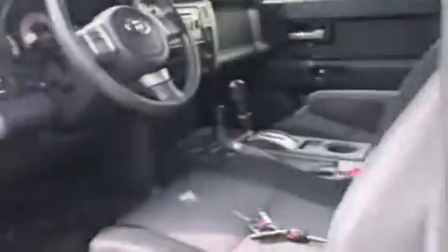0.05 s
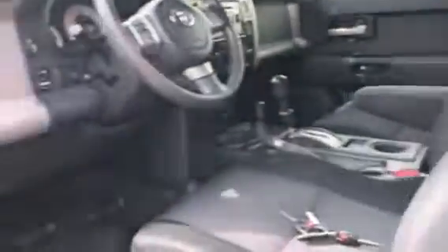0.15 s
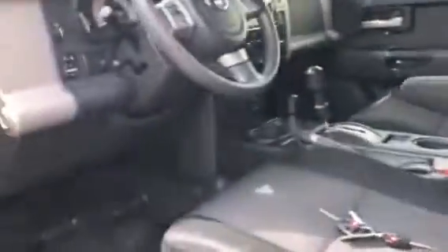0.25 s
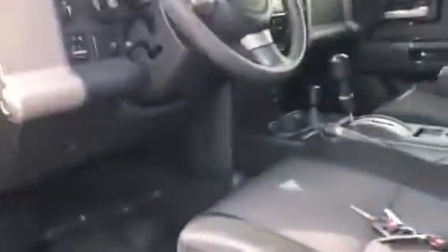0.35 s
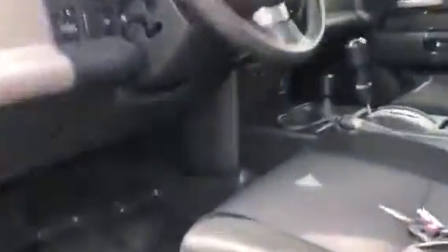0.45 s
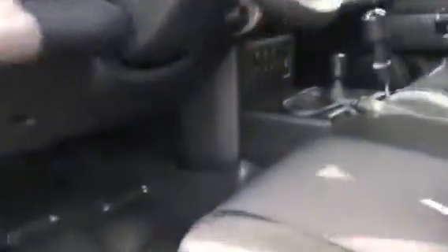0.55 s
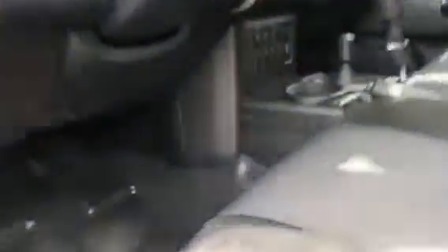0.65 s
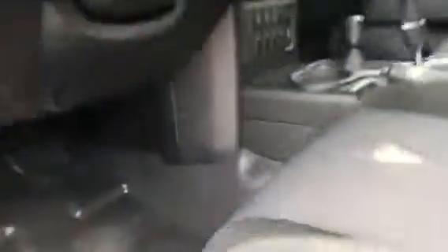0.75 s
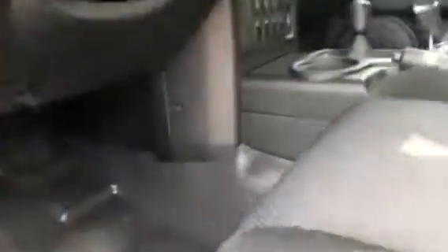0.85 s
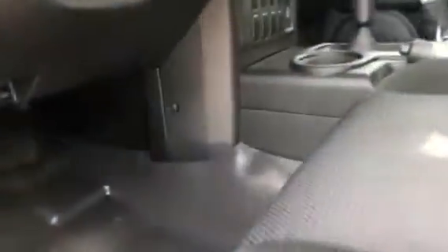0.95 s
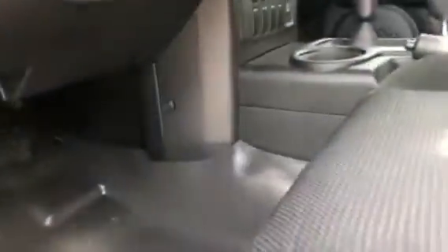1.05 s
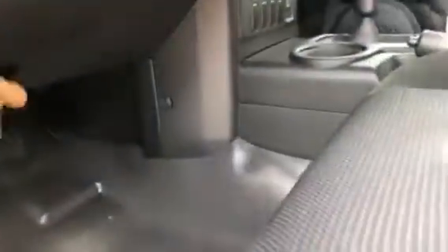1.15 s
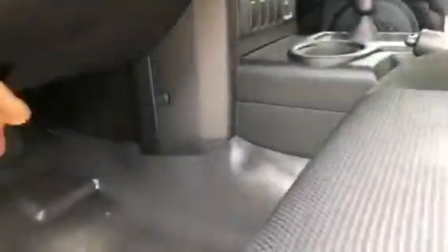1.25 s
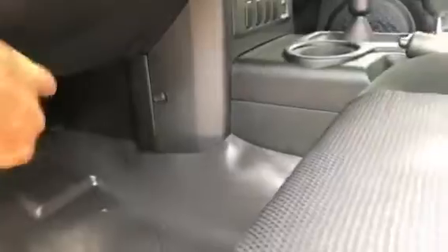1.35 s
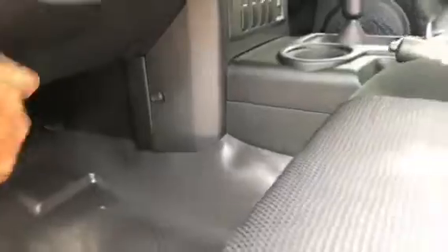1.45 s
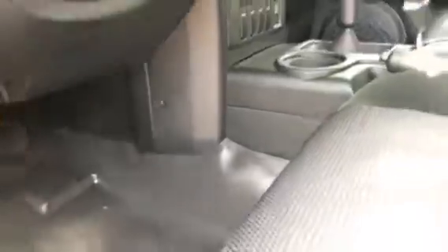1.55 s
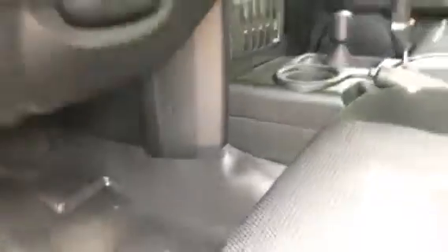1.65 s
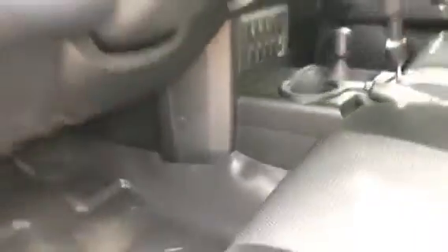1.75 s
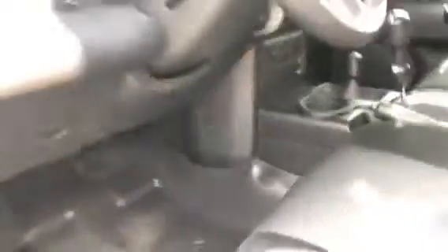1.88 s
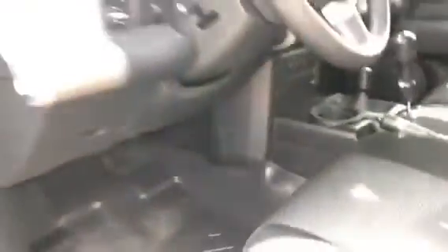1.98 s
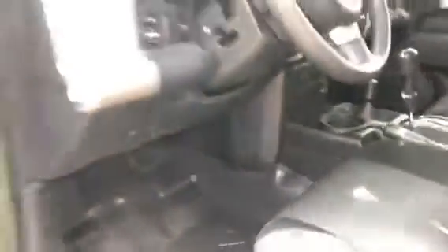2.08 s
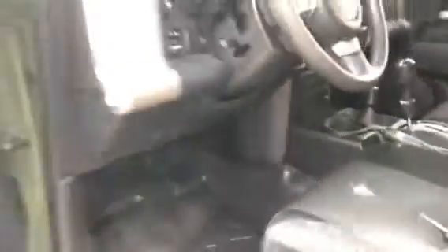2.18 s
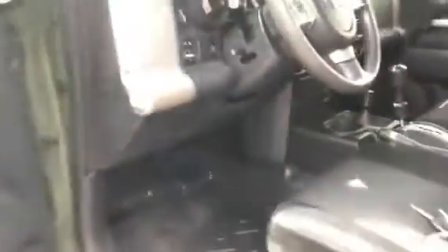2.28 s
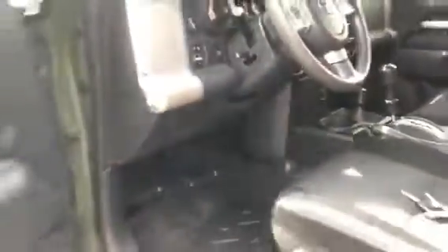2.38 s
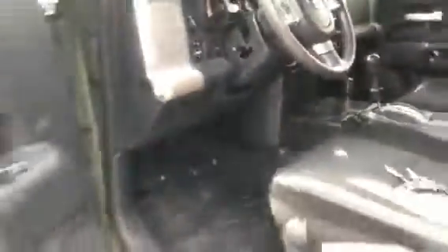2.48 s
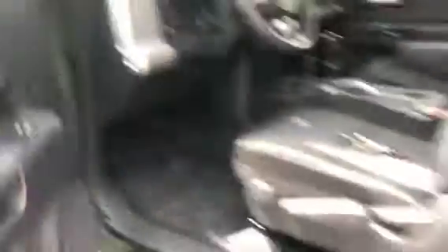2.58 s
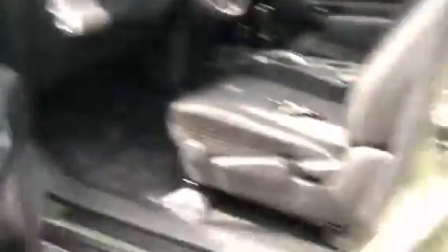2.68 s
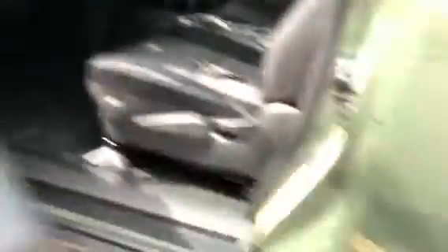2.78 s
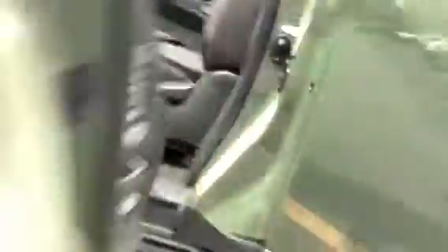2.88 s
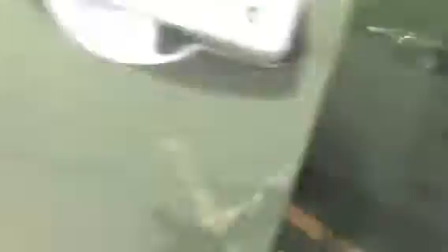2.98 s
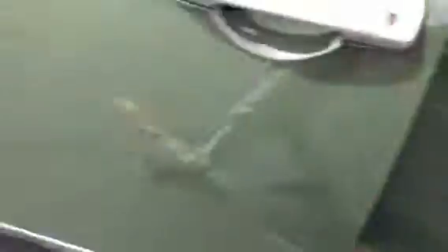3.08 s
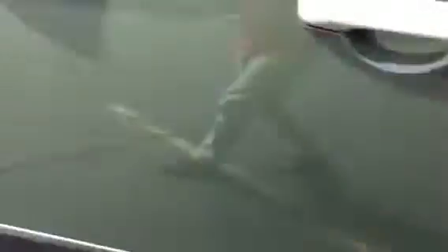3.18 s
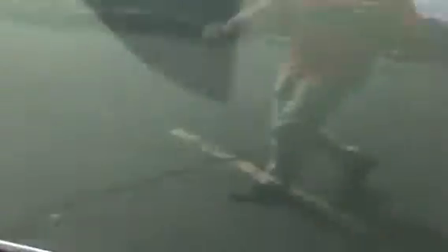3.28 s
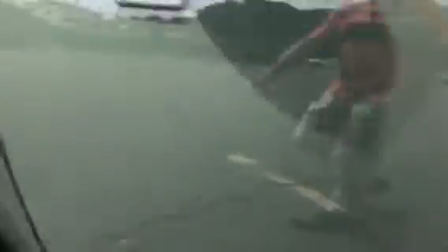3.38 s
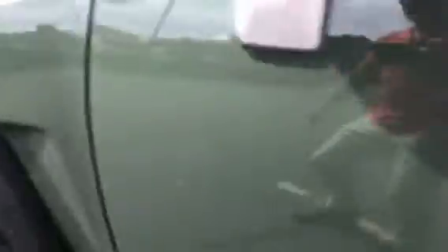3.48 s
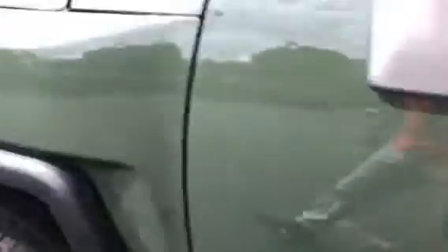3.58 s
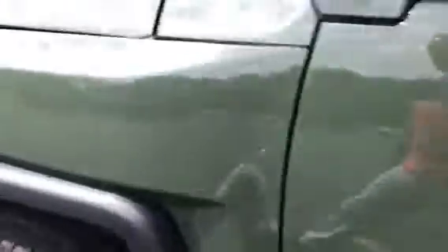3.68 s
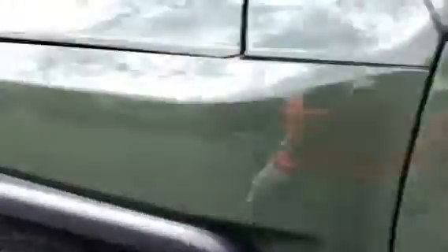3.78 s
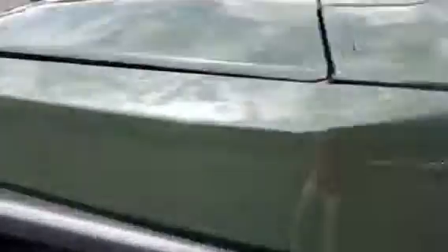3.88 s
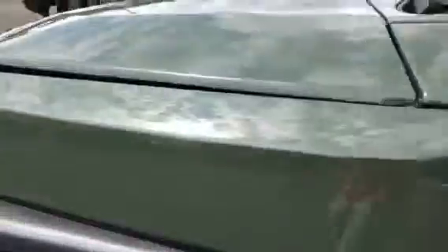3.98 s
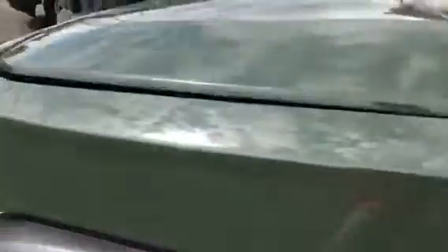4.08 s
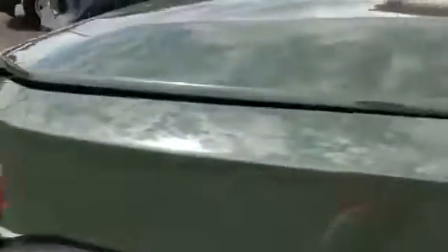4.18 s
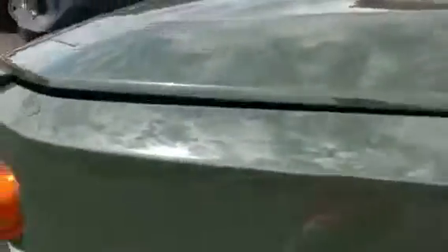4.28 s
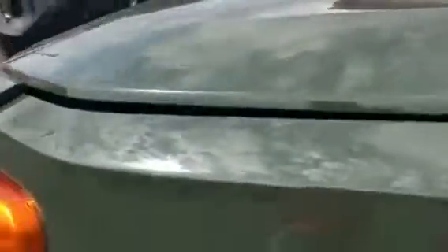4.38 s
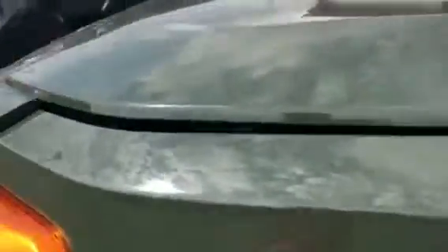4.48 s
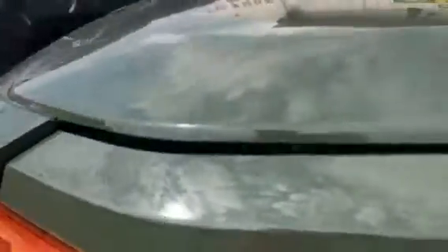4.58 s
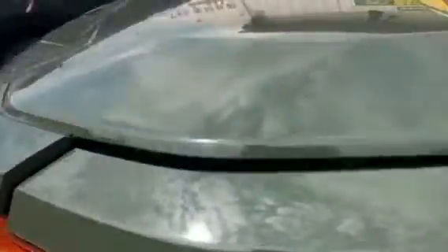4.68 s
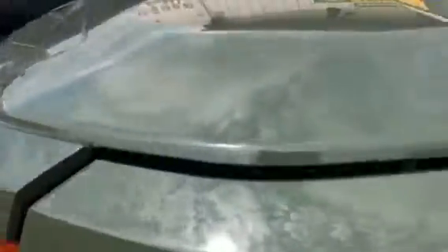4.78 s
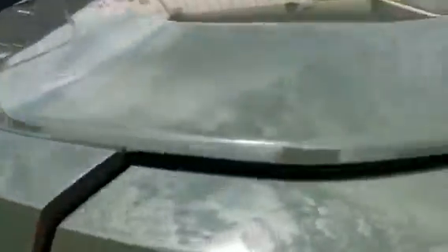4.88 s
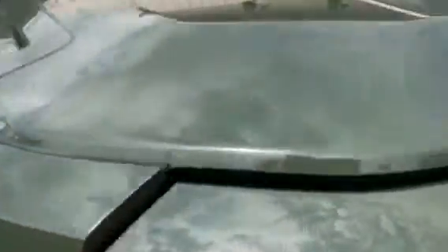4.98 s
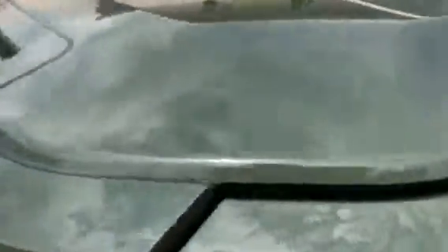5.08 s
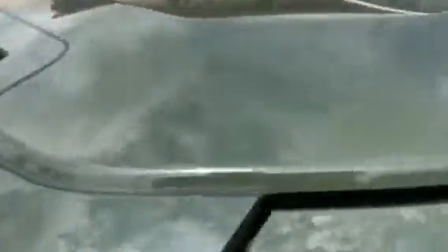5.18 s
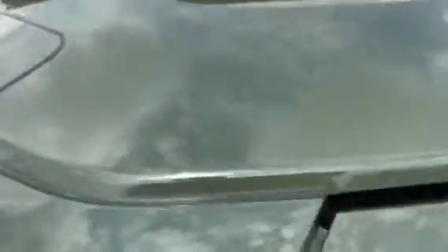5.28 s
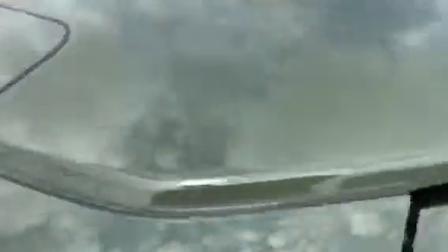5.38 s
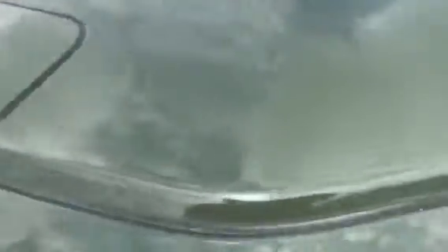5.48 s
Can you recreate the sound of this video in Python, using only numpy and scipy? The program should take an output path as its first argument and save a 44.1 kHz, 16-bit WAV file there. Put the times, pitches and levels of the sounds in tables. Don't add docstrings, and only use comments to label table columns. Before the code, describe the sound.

One microphone is carried from a car's driver's seat to its hood outdoors. A little low wind flutter opens over quiet air hiss and distant traffic rumble. From about 0.6 to 1.3 seconds a hand gropes under the dash, with soft rubs, tiny scratches and light taps. At 1.35 the hood latch pops loudly, with a thumping metallic rebound; at 1.52 the lever snaps back with a short bright knock. Rubbing and firmer taps continue from 1.7 to 2.5, then very faint hinge creaks at 2.53 to 2.65. Wind bursts swell around 2.9 to 3.2, and the door slams at 3.22, a dense heavy clunk with booming panels, followed by blustery thuds until 3.5. A quieter stretch lets a faint fast valve ticking and airy engine hiss through. Wind returns around 4.4, buffeting hard from 4.87 to 5.3 and again near 5.45, with a small tap at 4.99 and a brief rub at 5.3.

```python
import sys
import numpy as np
from scipy import signal
from scipy.io import wavfile
from scipy.ndimage import uniform_filter1d

SR = 44100
rng = np.random.default_rng(int(sys.argv[2]) if len(sys.argv) > 2 else 0)


def attenuation_scalar(level_db):
    decades = np.asarray(level_db, float) / 20
    return 10 ** decades


def bounce(signal):
    frames = np.transpose(np.atleast_2d(signal))
    limited = np.clip(frames, -1, 1)
    pcm = np.round(limited * 32767).astype(np.int16)
    wavfile.write(sys.argv[1], SR, pcm)


N = 244446
T = np.arange(N) / SR
BAND_EDGES_HZ = 28 * 2 ** np.arange(0, 9.5, .4)

# time_s, peak_db, weight_db_per_octave
LATCH_HITS = [
    (1.349, -15, 0),
    (1.3515, -11.5, -1),
    (1.3555, -25, -8),
    (1.361, -20.5, -1),
    (1.367, -18, -3),
    (1.373, -21, -1.5),
    (1.378, -26.5, 1),
    (1.398, -40.5, -7),
]
LEVER_HITS = [
    (1.519, -43, 6.5),
    (1.5252, -10.5, 0),
    (1.54, -25, 6),
]
DOOR_HITS = [(3.2145, -23, -8), (3.2175, -10.5, -2.5), (3.225, -14.5, 1.5), (3.229, -20.5, -2),
             (3.234, -8, -5.5), (3.238, -19, 4.5), (3.25, -43.5, 10), (3.2575, -8.5, 1), (3.268, -13.5, 0),
             (3.272, -28, -1.5), (3.288, -21.5, 3), (3.315, -27, -4), (3.335, -30, 0)]
# pitch_hz, level_db_per_hz
LATCH_COLOUR = [(35, -36), (60, -2), (193, -9.5), (301, -9.5), (417, -11.5), (553, -17), (1580, -18.5),
                (1860, -22), (2050, -22.5), (3270, -37), (3580, -27.5), (7940, -29), (16000, -43.5)]
LEVER_COLOUR = [(35, -32), (60, -22.5), (130, -14), (256, -17), (323, -4.5), (566, -18.5), (636, -12.5),
                (1220, -10), (1410, -20), (2000, -8), (2350, -13), (8710, -14.5), (16000, -26.5)]
DOOR_COLOUR = [(24, -44), (40, -12), (101, -21), (171, -8), (320, -23.5), (363, -16), (680, -18.5),
               (990, -18.5), (1370, -39), (1520, -21.5), (2100, -29.5), (6820, -34), (16000, -47)]
# pitch_hz, t60_s
LATCH_DECAY = [(80, 0.94), (300, 0.33), (1500, 0.25), (6000, 0.092), (15000, 0.18)]
LEVER_DECAY = [(80, 0.19), (300, 0.13), (1500, 0.12), (6000, 0.11), (15000, 0.087)]
DOOR_DECAY = [(60, 0.31), (300, 0.5), (1500, 0.18), (6000, 0.1), (15000, 0.062)]
# pitch_hz, level_db, t60_s
LATCH_MODES = [(100, -4, 0.48), (410, -10, 0.14), (897, 6, 0.032), (1155, -5, 0.065), (1541, 0, 0.043),
               (2380, 4, 0.017), (3050, -9.5, 0.027), (3700, -12, .03), (3900, -5, 0.027), (4560, -9, .03)]
LEVER_MODES = [(150, 7.1, 0.11), (330, 3, 0.13), (990, 26.2, 0.015), (2270, 13, 0.032), (4770, 15, .03),
               (6480, 4.7, .025)]
DOOR_MODES = [(76.5, 4.5, 0.28), (182, -16, 0.13), (490, 6, 0.042), (1020, 11, 0.018), (1194, 5, 0.042),
              (1960, -3, 0.032), (2320, -1, 0.018), (2710, 0, 0.011), (3500, -3, 0.0092), (7080, -5, .012)]

# time_s, length_s, slip_rate_hz, level_db, slope_db_per_overtone
CREAKS = [(2.534, 0.011, 650, -49, -4.5), (2.547, 0.0044, 540, -40.5, -6.5), (2.566, 0.022, 537, -43, -7.5),
          (2.598, 0.018, 543, -42, -4.5), (2.618, 0.022, 946, -45.5, -8), (2.652, 0.056, 491, -53.5, -2)]

# time_s, peak_db, dull_body_db, body_hz, airy_top_db
TAPS = [(0.8033, -30, 11, 496, -35), (0.8227, -33, -2, 296, -23), (0.9394, -38, -37, 415, 2),
        (1.182, -35, 1, 244, -20), (1.2637, -21.5, -9.5, 1020, -3), (1.327, -26.5, -10, 1620, -7),
        (1.637, -42, 15.5, 500, -19), (1.9404, -24, -21, 408, -7.5), (1.9845, -26, -21, 626, -27),
        (2.2108, -24, -19, 528, -39.5), (2.3, -21.5, -18, 420.3, -3), (2.4912, -19, -13.5, 883, -39),
        (2.881, -28, 4, 243, -31), (2.9054, -44.5, 19.5, 276, -23), (4.989, -39.5, -16, 261, 5.5)]
CRACK_T60_S, BODY_T60_S = 0.086, 0.037

# time_s (full pressure), hold_s, level_db, top_end_db, low_end_db
RUBS = [(0.602, 0.013, -54.5, -8, -10), (0.874, 0.059, -48.5, 0, -15), (0.964, .07, -65, 4, -12),
        (1.039, .05, -51.5, 3, -23), (1.115, 0.11, -55.5, 2.5, -14), (1.442, 0.13, -48, -7, 13.5),
        (1.743, 0.017, -51, -7, -15), (1.944, 0.029, -51.5, -7, 12), (2.163, .055, -42.5, -20, -11),
        (2.217, .015, -38, 0, -23), (2.27, .03, -44, -10, -3), (2.299, 0.01, -32.5, -7, -1),
        (2.324, .075, -44.5, -7, -13), (2.887, .06, -56.5, -7, 22.5), (5.318, 0.056, -46.5, -8, 10.5)]
RUB_RISE_DB_PER_S, RUB_FALL_DB_PER_S = 704, 396
# time_s, lowest_cavity_hz
CUPPING = [(.85, 2500), (.9, 2910), (.95, 3900), (1.05, 3194), (1.13, 2920), (1.2, 2286), (1.75, 3340),
           (1.95, 2702), (2.155, 4325), (2.18, 2680), (2.22, 2290), (2.27, 3500), (2.31, 2650),
           (2.36, 2610), (2.41, 3500), (5.3, 2253), (5.4, 3640)]
# multiple_of_lowest, width_hz, level_db
CAVITIES = [(1, 500, 5), (1.45, 704, -0.5), (3.2, 1520, 1.5)]
CAVITY_FLICKER_DB = 2.5
# time_s, pitch_hz, level_db, length_s
SNAGS = [(.725, 444, -46, .015), (.746, 1050, -52, .0036), (.775, 450, -49, .01), (.804, 1400, -40, .003),
         (.804, 950, -42, .003), (.826, 1110, -48, .005), (.872, 11500, -54, .006), (.873, 2350, -50, .012),
         (.885, 774, -48, .015), (.889, 11200, -44, .003), (.905, 13800, -56, .004), (.91, 3120, -46, .011),
         (.942, 8500, -50, .003), (.99, 8800, -55, .005), (1.032, 4500, -56, .003),
         (1.052, 3620, -51, .004), (1.06, 1710, -51, .016), (1.08, 1300, -48, .004),
         (1.112, 3200, -51, .004), (1.132, 9500, -52, .005), (1.163, 11000, -52, .004),
         (1.185, 2230, -48, .0045), (1.267, 3300, -36, .003), (1.266, 2200, -40, .003),
         (1.267, 1400, -34, .0043), (1.331, 1590, -41, .0073), (1.941, 12000, -46, .0015),
         (2.158, 5400, -43, .005), (2.158, 13500, -50, .005), (2.213, 2195, -35, .0023),
         (2.214, 5400, -39, .003), (2.228, 2434, -45, .005), (2.228, 11000, -42, .004),
         (2.275, 14500, -48, .003), (2.29, 1910, -44, .003), (2.301, 8000, -33, .003),
         (2.302, 15000, -42, .002), (2.303, 2440, -34, .0033), (2.312, 8500, -40, .003),
         (2.36, 2670, -42, .004), (2.385, 7040, -47, .02), (2.498, 4300, -46, .005),
         (2.882, 7800, -50, .002), (2.9, 6700, -52, .012), (3.218, 2340, -14, .003),
         (3.227, 2640, -15, .0033), (3.235, 3250, -11.5, .0026), (3.318, 3200, -33, .006),
         (4.129, 12000, -54, .002), (5.186, 2200, -33, .0012)]
SNAG_WIDTH = 0.086

# time_s (full strength), level_db, hold_s
GUSTS = [(0.0, -28.5, 0.032), (0.048, -39, 0.038), (0.166, -41, 0.01), (0.307, -48, .004),
         (0.485, -39, .004), (1.044, -41.5, 0.017), (1.085, -46, 0.033), (3.051, -33, .03),
         (3.102, -20.5, 0.02), (3.172, -21, 0.099), (3.367, -24, 0.047), (3.434, -23, 0.0089),
         (3.502, -31.5, 0.049), (3.683, -37, 0.0037), (3.919, -31, 0.003), (4.112, -36, 0.0036),
         (4.421, -33, 0.046), (4.55, -33, 0.052), (4.644, -33.5, 0.11), (4.742, -35, 0.11),
         (4.877, -25.5, 0.058), (4.916, -25.5, 0.048), (4.991, -22.5, 0.036), (5.039, -25.5, 0.04),
         (5.091, -26.5, 0.075), (5.189, -24.5, 0.074), (5.407, -31, 0.009), (5.44, -21.5, 0.012),
         (5.535, -31, .01)]
GUST_RISE_DB_PER_S, GUST_FALL_DB_PER_S = 512, 582
# time_s, level_db, swing_hz, kink_db
DOOR_EDDIES = [(2.886, -26.5, 612, -7), (2.894, -28.5, 368, -6), (2.907, -33, 424, -7),
               (3.043, -28, 159, -44), (3.09, -18, 399, -30), (3.102, -17, 304, -7), (3.106, -7, 330, -17),
               (3.118, -9, 462, -10), (3.124, -8.5, 420, -20), (3.134, -12, 453, -13),
               (3.176, -5.5, 430, -16), (3.183, -5, 330, -8), (3.187, -8.5, 575, -5.5),
               (3.196, -5, 596, -9), (3.202, -30, 500, -12), (3.206, -9.5, 410, -10), (3.219, -7, 470, -26),
               (3.259, -6, 600, -1), (3.278, -11.5, 202, -20), (3.289, -10, 173, -9),
               (3.296, -14, 173, -27), (3.362, -9.5, 300, -26), (3.375, -13, 249, -30),
               (3.412, -9, 410, -19), (3.434, -26, 285, -25), (3.443, -13, 325, -41),
               (3.502, -15.5, 196, -48), (3.54, -27, 280, -30)]
# time_s, level_db, swing_hz, kink_db
BREEZE_EDDIES = [(.021, -29, 424, -7), (0.063, -28, 270, -29), (0.14, -20, 182, -50),
                 (0.199, -27.5, 287, -20), (0.486, -28.5, 240, -37), (1.136, -32.5, 410, -17),
                 (3.914, -26, 259, -24), (4.491, -25, 278, -19), (4.647, -23, 290, -27),
                 (1.16, -31, 400, -23), (4.824, -49, 440, -30), (4.869, -18, 302, -39),
                 (4.887, -20.5, 302, -38), (4.899, -20, 320, -40), (4.916, -20, 400, -21),
                 (4.925, -12, 401, -19), (4.933, -8, 234, -29), (4.937, -18, 330, -18),
                 (4.957, -19, 298, -15), (4.991, -14.5, 423, -17), (5.002, -17, 285, -36),
                 (5.009, -11, 570, -20), (5.018, -8.5, 440, -18.5), (5.027, -7.5, 286, -16),
                 (5.051, -13.5, 346, -31), (5.061, -22, 306, -33), (5.073, -15.5, 270, -23),
                 (5.1, -26, 355, -19), (5.126, -15, 350, -24), (5.146, -19, 495, -11),
                 (5.158, -16.5, 377, -32), (5.188, -9, 430, 2), (5.197, -9.5, 360, -27),
                 (5.225, -33, 298, -20), (5.241, -17.5, 305, -29), (5.25, -20, 238, -29),
                 (5.262, -14, 656, -14.5), (5.271, -11.5, 477, -27), (5.402, -14.5, 536, -13.5),
                 (5.443, -28, 432, -17), (5.457, -8.5, 527, -14), (5.49, -17, 438, -24),
                 (.746, -35.5, 420, -8), (1.016, -34.5, 378, -25), (1.051, -30, 201, -30),
                 (1.063, -36, 213, -35), (1.088, -38, 130, -40),
                 (4.434, -23.5, 196, -40), (4.45, -20.5, 176, -40), (4.575, -37, 164, -40),
               (4.616, -36, 179, -40), (4.703, -38, 150, -40), (4.742, -28, 366, -26),
               (4.823, -18, 150, -35), (5.393, -17, 251, -30), (5.412, -26, 137, -45),
               (5.431, -24, 297, -16), (5.468, -21.5, 131, -43), (5.419, -25, 94, -50),
               (5.453, -12.5, 100, -50), (5.5, -30, 96, -50), (5.236, -29, 75, -50), (0.079, -34, 95, -50),
               (.1, -34, 100, -50), (3.142, -16, 120, -44), (3.167, -14.5, 380, -25),
               (4.945, -27, 420, -21), (5.223, -23, 400, -20), (1.072, -31, 170, -45)]
EDDY_CYCLES, TORN_SHARE = 1.33, 0.19
KINK_HZ, KINK_S = 890, 0.00019
CRACKLE_DB, CRACKLE_S = -13.5, 0.0013

# time_s, breeze_and_traffic_db, engine_distance_m
WALK = [(0, -35, 5.7), (.3, -49, 6.6), (1.9, -49.5, 5.2), (2.5, -46, 4.5), (2.9, -48, 2.3),
        (3.3, -34.5, 3.2), (3.75, -50.5, 1.9), (4.4, -45.5, 4), (4.8, -39.5, 3.8), (5.05, -38, 3.9),
        (5.54, -45.5, 2.4)]
# pitch_hz, width_hz, level_db
VALVES = [(3600, 500, -12), (5080, 600, 1), (6450, 450, -5), (7600, 1200, -12)]
# share_of_turn, level_db
TICKS = [
    (0, 1),
    (.3, -11),
    (.63, -5),
]
TURN_S, FIRST_TICK_S, TURNS = .0828, 2.480, 37
BREATHER_SHARE, BREATHER_DB = .42, -1
ENGINE_DB_AT_1M, OPEN_AIR_DB, CABIN_SHADE_DB, HOOD_SHADE_DB = -46, -44, -4, -4
LEAVE_CABIN_S, REACH_HOOD_S = (2.9, 2.54), (4.5, 5.1)
# pitch_hz, level_db_per_hz
RUMBLE = [(15, -38), (25, -22), (59, 7.5), (107, -1.5), (143, -1.5), (271, -10), (500, -42.5), (650, -14.5),
          (1100, -120)]
# pitch_hz, level_db_per_hz
HISS = [(180, -60.5), (300, -20.5), (412, 0.5), (494, -3), (656, -3.5), (762, -6.5), (1060, -6.5),
        (1320, -9.5), (2140, -16), (16000, -38)]


def rms_one(x):
    return x / np.sqrt(np.mean(x ** 2) + 1e-20)


def band(x, low_hz, high_hz, order=2):
    sos = signal.butter(order, [low_hz, min(high_hz, .47 * SR)], "band", fs=SR, output="sos")
    return signal.sosfilt(sos, x)


def noise(low_hz, high_hz, order=2):
    return rms_one(band(rng.standard_normal(N), low_hz, high_hz, order=order))


def narrow(hz, width_hz):
    phase = 2 * np.pi * np.cumsum(hz + np.zeros(N)) / SR
    r = np.exp(-np.pi * width_hz / SR)
    a, b = signal.lfilter([1], [1, -r], rng.standard_normal((2, N)))
    return rms_one(a * np.cos(phase) + b * np.sin(phase))


def at_hz(points, hz):
    points = np.array(points)
    return np.interp(np.log(hz), np.log(points[:, 0]), points[:, 1])


def in_time(table):
    s, *columns = np.transpose(table)
    return [np.interp(T, s, column) for column in columns]


def drift(rate):
    r = np.exp(-32 * np.pi * rate / SR)
    white = rng.standard_normal(N // 16 + 4002)
    slow = signal.lfilter([1], [1, -2 * r, r * r], white)[4000:]
    return np.interp(np.arange(N) / 16, np.arange(len(slow)), rms_one(slow))


def swells(s, db, hold, rise_db_per_s, fall_db_per_s):
    since = T[::16] - np.array(s)[:, None]
    rising = rise_db_per_s * np.minimum(since, 0)
    falling = fall_db_per_s * np.maximum(since - np.array(hold)[:, None], 0)
    each = np.array(db)[:, None] + rising - falling
    level_db = np.interp(T, T[::16], np.maximum(each.max(0), -90))
    return level_db, np.repeat(each.argmax(0), 16)[:N]


def clicks(times, gains):
    out = np.full(N, 1e-18)
    np.add.at(out, np.clip((np.asarray(times) * SR).astype(int), 0, N - 1), gains)
    return out


def dying(train, rise, t60):
    quick, slow = np.exp(-1 / (rise * SR)), attenuation_scalar(-60 / (t60 * SR))
    tail = signal.lfilter([1], [1, -slow], train)
    return signal.lfilter([1 - quick], [1, -quick], tail)


def ring(train, hz, t60):
    r, w = attenuation_scalar(-60 / (t60 * SR)), 2 * np.pi * hz / SR
    return signal.lfilter([0, np.sin(w)], [1, -2 * r * np.cos(w), r * r], train)


def coloured(spectrum, patchy_db):
    white, together, out = rng.standard_normal((2, N)), drift(4.5), 0
    for k, (low, high) in enumerate(zip(BAND_EDGES_HZ, BAND_EDGES_HZ[1:])):
        flicker_db = patchy_db * (together + drift(38.0))
        gain = attenuation_scalar(at_hz(spectrum, np.sqrt(low * high)) + flicker_db)
        out = out + gain * band(white[k % 2], low, high)
    return rms_one(out)


def blow(hits, spectrum, decay, modes, rattle_db, ring_db, crack_db):
    s, db, weight_db = np.transpose(hits)
    first = int((s[0] - .01) * SR)
    part = slice(first, first + SR)
    out, white = np.zeros(N), rng.standard_normal((2, SR))

    def strikes(hz, more_db):
        octaves_down = np.clip(np.log2(1500 / hz), -1, 3)
        return clicks(s, attenuation_scalar(db + more_db + weight_db * octaves_down))[part]

    for k, (low, high) in enumerate(zip(BAND_EDGES_HZ, BAND_EDGES_HZ[1:])):
        hz = np.sqrt(low * high)
        train = strikes(hz, rattle_db + at_hz(spectrum, hz))
        rise = .0002 + 1.2 / hz
        rattle = dying(train, rise, at_hz(decay, hz))
        crack = dying(train, .3 * rise, .02 + 8 / hz)
        out[part] += (rattle + attenuation_scalar(crack_db) * crack) * band(white[k % 2], low, high)
    for hz, level_db, t60 in modes:
        uneven_db = rng.normal(0, 3.06, len(s))
        train = strikes(hz, ring_db + level_db + uneven_db) * rng.choice([-1, 1])
        out[part] += ring(train, hz, min(t60, 110 / hz))
    return out


def hood_latch():
    return blow(LATCH_HITS, LATCH_COLOUR, LATCH_DECAY, LATCH_MODES, rattle_db=4.5, ring_db=-14.0, crack_db=4.5)


def hood_lever():
    return blow(LEVER_HITS, LEVER_COLOUR, LEVER_DECAY, LEVER_MODES, rattle_db=6.5, ring_db=-21.5, crack_db=9)


def door_slam():
    return blow(DOOR_HITS, DOOR_COLOUR, DOOR_DECAY, DOOR_MODES, rattle_db=14.0, ring_db=-10.0, crack_db=6.5)


def hinge():
    out, wobble = np.zeros(N), drift(59)
    for s, length, hz, db, slope_db in CREAKS:
        part = slice(int((s - .05) * SR), int((s + .05) * SR))
        phase = 2 * np.pi * np.cumsum(hz * (1 + 0.021 * wobble[part])) / SR
        tone = sum(attenuation_scalar(slope_db * k) * np.sin((k + 1) * phase) for k in range(4))
        swell = np.exp(-((T[part] - s) / (0.52 * length)) ** 2)
        out[part] += attenuation_scalar(db + 3.0) * swell * tone
    return out


def taps():
    out, crack, air = np.zeros(N), noise(960, 3700), noise(4700, 12000)
    for s, db, body_db, hz, air_db in TAPS:
        part = slice(int(s * SR), int((s + .3) * SR))
        hit = clicks([0], 0.92)[:part.stop - part.start]
        body = ring(dying(hit, .0001, 0.0011) / 8, hz, BODY_T60_S)
        body += 0.29 * ring(hit, 2.85 * hz, 0.22 * BODY_T60_S)
        body += 0.23 * ring(hit, 1.7 * hz, 0.55 * BODY_T60_S)
        snap = dying(hit, 0.00071, CRACK_T60_S) * (crack + attenuation_scalar(air_db) * air)[part]
        out[part] += attenuation_scalar(db - 20.5) * snap + attenuation_scalar(db + body_db) * body
    return out


def rubbing():
    s, hold, db, top_db, low_db = np.transpose(RUBS)
    level_db, stroke = swells(s, db, hold, RUB_RISE_DB_PER_S, RUB_FALL_DB_PER_S)
    top_db, low_db = top_db[stroke], low_db[stroke]
    uneven = attenuation_scalar(1.5 * drift(79) + 1.8 * drift(900))
    grains = rng.standard_normal(N) * uneven
    (lowest_hz,) = in_time(CUPPING)
    middle = band(grains, 1900, 7800)
    for share, width_hz, cavity_db in CAVITIES:
        flicker = attenuation_scalar(cavity_db - 16.5 + CAVITY_FLICKER_DB * drift(25))
        middle = middle + flicker * uneven * narrow(share * lowest_hz, width_hz)
    top, low = band(grains, 5000, 23000), band(grains, 456, 1100)
    mix = rms_one(middle) + attenuation_scalar(top_db) * rms_one(top) + attenuation_scalar(low_db - 13) * rms_one(low)
    return attenuation_scalar(level_db - 4.5) * mix


def snags():
    out, t = np.zeros(N), np.arange(-1500, 1500) / SR
    for (s, hz, db, length), white in zip(SNAGS, rng.standard_normal((len(SNAGS), 3000))):
        scratch = band(white, hz * (1 - SNAG_WIDTH), hz * (1 + SNAG_WIDTH))
        scratch = scratch * np.exp(-(t / length) ** 2)
        at = int(s * SR)
        out[at - 1500:at + 1500] += attenuation_scalar(db) * scratch / np.abs(scratch).max()
    return out


def wind_flutter():
    level_db, _ = swells(*np.transpose(GUSTS), GUST_RISE_DB_PER_S, GUST_FALL_DB_PER_S)
    flutter = noise(105.6, 195.4, order=3)
    height = np.sqrt(uniform_filter1d(flutter ** 2, size=600) + 0.2)
    flutter = rms_one(flutter / height)
    lumps = np.minimum(drift(32), 1.2)
    out = attenuation_scalar(level_db + 4.3 * lumps - 2.5) * flutter
    body_db = level_db + 0.7 * (level_db + 26.5) + 2.6 * drift(39) - 7.0
    out += attenuation_scalar(body_db) * noise(207.5, 318, order=3)
    bright_db = level_db + 0.82 * (level_db + 32.0) + 0.78 * drift(49) - 18.5
    out += attenuation_scalar(bright_db) * noise(313, 655, order=3)
    edge_db = level_db + 0.82 * (level_db + 22.5) + 5.6 * drift(51) - 21.5
    out += attenuation_scalar(edge_db) * noise(640, 970, order=2)
    return out


def wind_eddies():
    out, eddies = np.zeros(N), DOOR_EDDIES + BREEZE_EDDIES
    ragged = noise(389, 554, order=2)
    crackle = noise(980, 2100, order=3)
    t = np.arange(-1200, 1200) / SR
    for (s, db, hz, kink_db), (phase, shift) in zip(eddies, rng.random((len(eddies), 2))):
        at = max(int(s * SR), 1200)
        part = slice(at - 1200, at + 1200)
        length = .5 * EDDY_CYCLES / hz
        turns = hz * (1.113 * t - 0.38 * length * np.log(np.cosh(t / length)))
        swing = np.sin(2 * np.pi * (turns + phase)) + TORN_SHARE * ragged[part]
        swing = swing / np.cosh(t / length)
        late = t + 0.001177 + 0.0003 * shift
        front_s = KINK_S * attenuation_scalar(-0.15 * min(kink_db - 24.5, 0))
        kink = np.cos(2 * np.pi * (KINK_HZ * late + phase)) / np.cosh(late / front_s)
        spray = crackle[part] / np.cosh(late / CRACKLE_S)
        kink += attenuation_scalar(CRACKLE_DB + 1.05 * min(kink_db, -9)) * spray
        out[part] += attenuation_scalar(db - 4.5) * (swing + attenuation_scalar(min(kink_db, -4) + 8.5) * kink)
    return out


def open_air_db():
    cabin_db = np.interp(T, LEAVE_CABIN_S, [CABIN_SHADE_DB, 0])
    hood_db = np.interp(T, REACH_HOOD_S, [0, HOOD_SHADE_DB])
    return OPEN_AIR_DB + cabin_db + hood_db


def idling_engine():
    _, metres = in_time(WALK)
    engine_db = ENGINE_DB_AT_1M - 20 * np.log10(metres)
    turns = FIRST_TICK_S + TURN_S * np.arange(TURNS)
    uneven_db = rng.normal(0, 2.2, (3, TURNS))
    train = 0
    for (share, db), more_db in zip(TICKS, uneven_db):
        train = train + clicks(turns + TURN_S * share, attenuation_scalar(db + more_db))
    metal = sum(attenuation_scalar(db) * noise(hz - width / 2, hz + width / 2, order=2) for hz, width, db in VALVES)
    body_shade = np.interp(T, [2.5, 2.9, 4.16, 4.22], [.6, 1.15, 1.25, .35])
    ticks = metal * dying(train, .004, .075) * body_shade
    puffs = clicks(turns + TURN_S * BREATHER_SHARE, attenuation_scalar(BREATHER_DB + 1.5 * uneven_db[1]))
    puffs = dying(puffs, .008, .13) * noise(3350, 3850)
    fan_and_intake = 0.43 * noise(4000, 6660) + 0.12 * noise(3100, 3900)
    fan_whine = attenuation_scalar(open_air_db() - 16.0) * noise(671, 732) * np.clip(T - 2.4, 0, 1)
    return attenuation_scalar(engine_db - 1.0) * (ticks + fan_and_intake + puffs) + fan_whine


def traffic_and_air():
    rumble_db, _ = in_time(WALK)
    hiss = coloured(HISS, patchy_db=.5)
    rumble = coloured(RUMBLE, patchy_db=1.2)
    return attenuation_scalar(rumble_db + 3.0) * rumble + attenuation_scalar(open_air_db() - 7.0) * hiss


def scene():
    car = hood_latch() + hood_lever() + door_slam() + hinge()
    hand = taps() + rubbing() + snags()
    wind = wind_flutter() + wind_eddies()
    return (car + hand + wind + idling_engine() + traffic_and_air())[None]


def top_cut(x):
    return signal.sosfilt(signal.butter(12, 17000, fs=SR, output="sos"), x)


def record(dry):
    heard = signal.sosfilt(signal.butter(3, 42, "high", fs=SR, output="sos"), dry)
    limited = heard / (1 + (heard / .74) ** 4) ** .25
    mix = signal.sosfilt(signal.cheby2(16, 50, 16050, fs=SR, output="sos"), limited)
    return top_cut(mix)


dry = scene()
out = record(dry)
bounce(out)
```